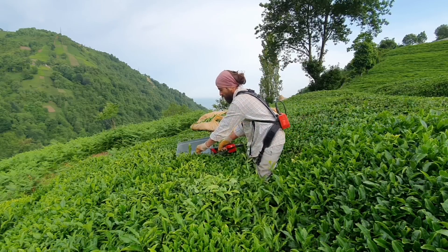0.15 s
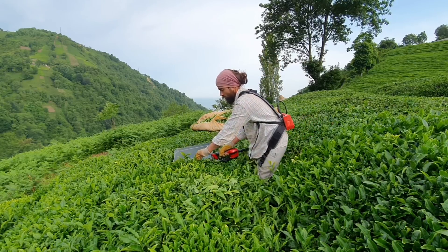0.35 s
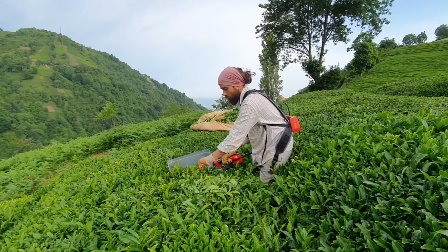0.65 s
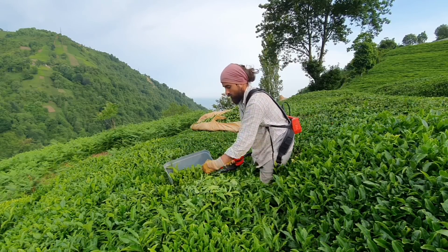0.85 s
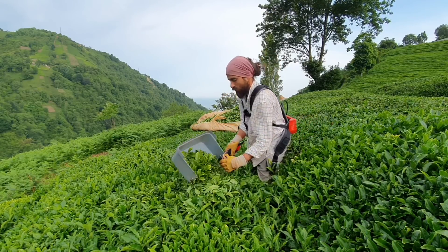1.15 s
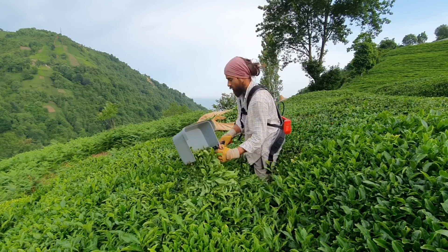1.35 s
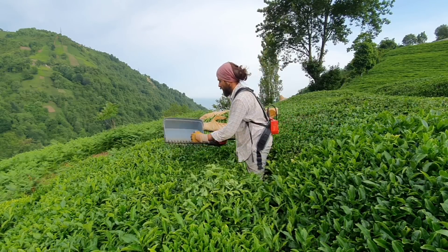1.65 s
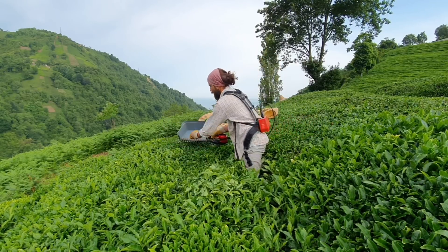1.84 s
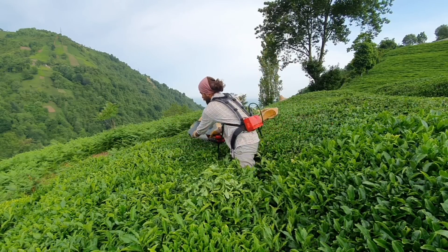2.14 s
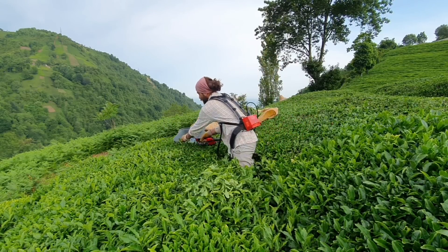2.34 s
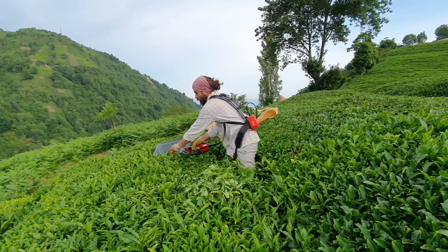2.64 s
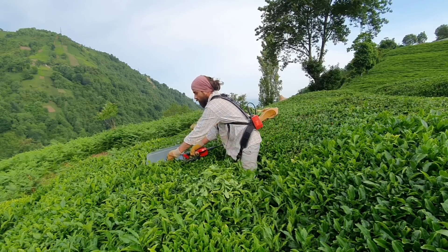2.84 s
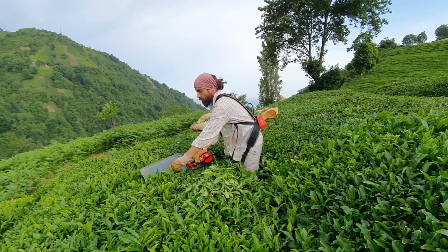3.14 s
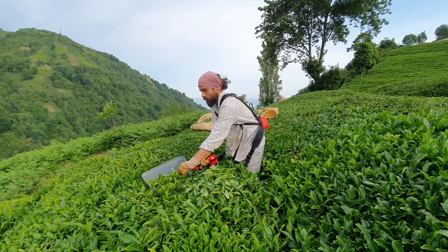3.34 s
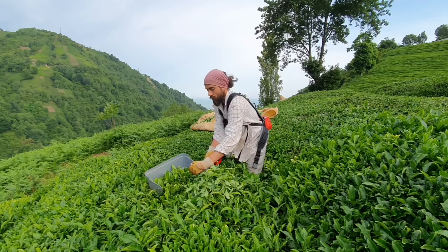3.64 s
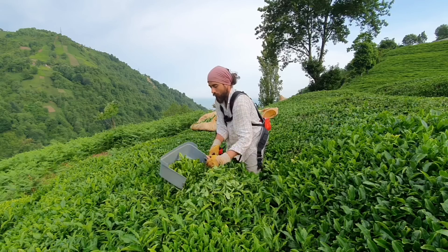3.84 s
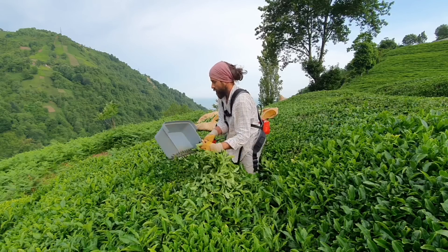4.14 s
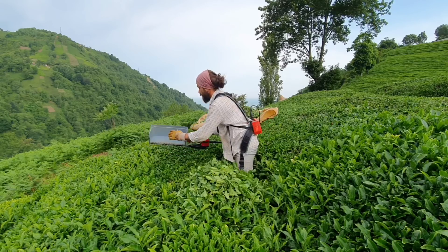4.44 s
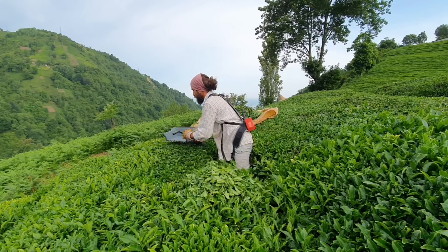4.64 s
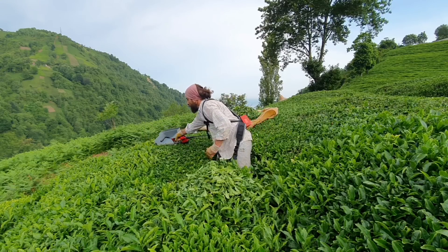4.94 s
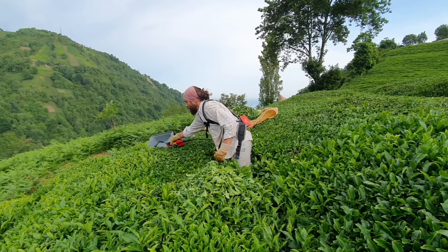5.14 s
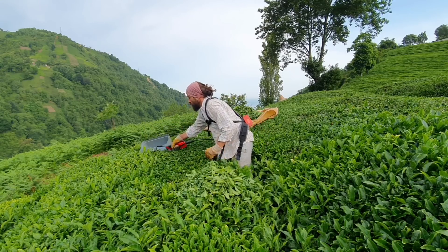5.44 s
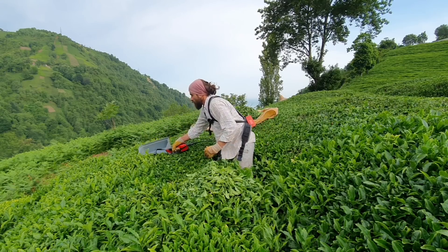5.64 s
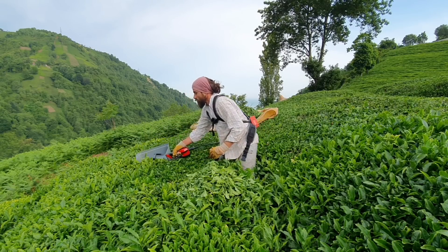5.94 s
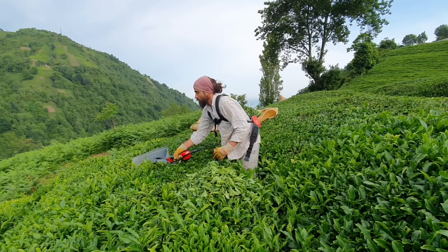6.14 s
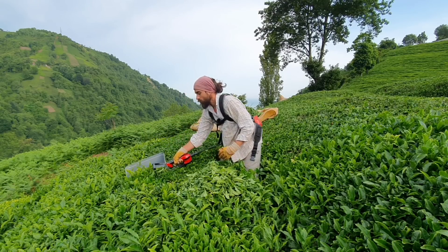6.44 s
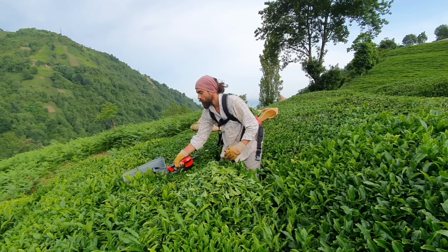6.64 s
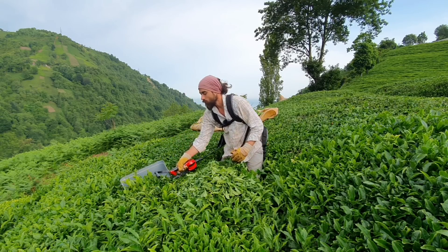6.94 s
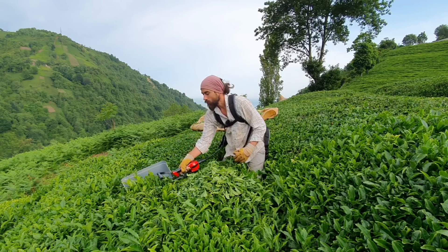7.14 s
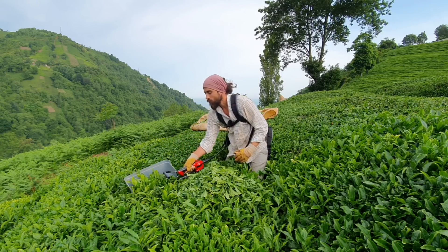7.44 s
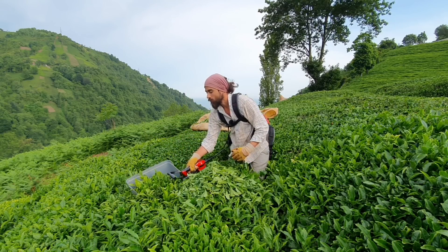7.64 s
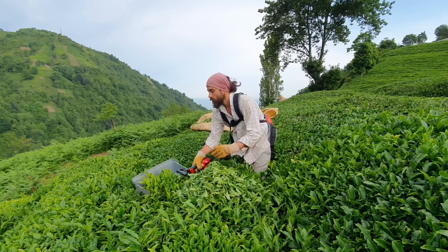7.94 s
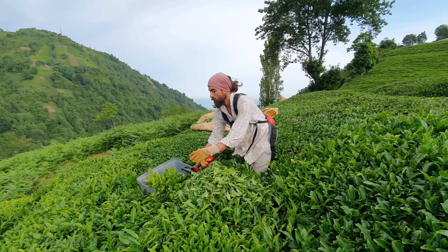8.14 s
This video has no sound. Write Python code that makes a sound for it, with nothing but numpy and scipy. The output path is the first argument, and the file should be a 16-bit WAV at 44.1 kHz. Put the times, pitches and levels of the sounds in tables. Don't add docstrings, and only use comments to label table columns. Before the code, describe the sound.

A battery-powered shear buzzes and clatters steadily through leafy bushes outdoors, its gear whine swelling while leaves snip and occasional woody stems crack.

```python
import sys
import numpy as np
from scipy import signal
from scipy.fft import rfft, irfft, next_fast_len
from scipy.io import wavfile
from scipy.ndimage import uniform_filter1d, map_coordinates

SR = 44100
rng = np.random.default_rng(int(sys.argv[2]) if len(sys.argv) > 2 else 0)


def volts_from_db(level):
    exponent = np.asarray(level, float) / 20
    return 10 ** exponent


def generate_wav(sig):
    pcm = np.round(np.clip(np.atleast_2d(sig).T, -1, 1) * 32767).astype(np.int16)
    wavfile.write(sys.argv[1], SR, pcm)


N = 365148

CRANK_HZ = 30.55
# (time [s], lateness [ms])
CRANK_LAG = [(0.0, 3.8), (1.0, 4.0), (1.2, 3.61), (1.6, 2.74), (1.8, 2.78), (2.0, 3.15), (2.6, 2.95),
             (3.1, 2.62), (3.8, 2.5), (4.4, 1.23), (4.8, 2.65), (5.25, 2.6), (5.6, 1.93), (6.0, 1.7),
             (6.4, 1.24), (7.3, 1.25), (7.8, 1.54), (8.28, 0.22)]

# (time [s], knock [dB], whine [dB], share of the open side facing the microphone [0-1])
BODY = [(0, -32.5, -23, 0.6), (.45, -35.5, -25, 0.26), (.65, -34.5, -38, 0.56), (1.08, -34, -29, 0.35),
        (1.18, -32, -20.5, 0.52), (1.4, -32, -20, 0.14), (1.65, -34.5, -20, 0.4), (1.87, -30.5, -22.5, 0.8),
        (2.1, -33.5, -27.5, 0.5), (2.9, -34, -23.5, 0.33), (3.5, -33, -33, 0.26), (4.05, -31.5, -28.5, 0.3),
        (4.22, -33, -21, 0), (4.45, -31, -22.5, 0.45), (4.6, -31.5, -29, 0.67), (4.85, -30, -27, 0.7),
        (5.15, -29, -20, 0.58), (5.28, -28, -25, 0.64), (5.55, -29.5, -25, 0.57), (5.82, -32, -31, 0.63),
        (6.5, -33, -31, 0.28), (7.25, -33, -29, 0.46), (8.28, -33, -32, 0.31)]
OPEN_SWAY, SHAKE_DB, WHINE_SHAKE_DB = .06, .5, 1
# (centre [Hz], width [Hz], level [dB])
HOUSING_MODES = [
    [(390, 32, 2), (577, 29, 3), (726, 180, -6.5), (896, 24, -6.5), (2020, 1130, -9.5)],
    [(390, 56, -8), (550, 21, -27), (686, 41, 2), (877, 38, 9.5), (1009, 47, -0.5), (1780, 750, 1)],
]
# (centre [Hz], width [Hz], level [dB])
THUD_MODES = [
    [(650, 370, 0)],
    [(810, 340, 0)],
]
# (centre [Hz], width [Hz], level [dB])
CASE_MODES = [
    [(1415, 210, 0)],
    [(1491, 110, 0)],
]
# (centre [Hz], width [Hz], level [dB])
TRAY_MODES = [(420, 45, -4), (568, 40, 0), (855, 55, 1)]
TRAY_DB = -9
# (time [s], rise [dB], width [s])
TRAY_LIFTS = [
    (1.68, 8, .3),
    (4.4, 7, .3),
]
# (place [fraction of a turn], level [dB])
FORWARD_STOPS = [
    (-.098, -10),
    (-.048, 0),
]
RETURN_PLACES = [
    .345,
    .397,
    .446,
]
# (time [s], first pin [dB], second pin [dB], stop [dB], lateness [turns])
RETURN_LEVELS = [(.5, -8, -5, -6, .002), (1.05, -9, -5, -6, 0), (1.25, -14, -4, -2.5, -.003),
                 (1.9, -14, -4, -2.5, -.003), (2.3, -5, -9, -8, 0), (2.9, -6, -9, -8, 0),
                 (3.4, -13, -6, -6, 0), (4.75, -13, -5, -4, 0), (4.95, -16, -9, -10, .006),
                 (5.55, -16, -9, -10, .006), (5.9, -14, -4, -6, .002), (6.6, -14, -4, -6, .002),
                 (7, -14, -11, -2.5, .004)]
# (time [s], level [dB])
KNOCK_ACCENTS = [(0.249, -7), (0.56, -10), (0.674, 3.4), (1.312, -3.2), (1.345, -8), (1.459, 2), (1.737, 3),
                 (1.934, -6), (2.048, -4), (2.081, -3.2), (2.13, -2.7), (2.474, -2), (2.507, -7),
                 (2.539, -3.2), (2.605, -1), (2.801, 1), (2.817, -5), (2.866, 2), (3.079, -3.3),
                 (3.095, -12), (3.423, -7), (3.537, 4), (3.75, 0), (3.946, -10), (4.06, 0), (4.289, -14),
                 (4.436, -12), (4.6, -3), (4.847, -1), (4.896, 1), (5.059, -2), (5.125, 8), (5.141, -2.8),
                 (5.19, 4), (5.419, 0.5), (5.484, 5), (5.517, 2), (6.057, 5), (6.089, -3), (6.302, 1),
                 (6.727, 2), (6.826, 0), (6.907, 0.5), (6.924, -6), (6.973, -10), (6.989, -8), (7.022, 5.0),
                 (7.104, 3.6), (7.12, -1), (7.137, 1), (7.153, -12), (7.251, -4.6), (7.579, -16),
                 (7.628, -2.7), (7.759, 5), (7.791, -14)]
# (time [s], level [dB])
CLACK_ACCENTS = [(0.069, -6), (0.101, 2), (0.265, -2.2), (0.413, -3), (0.445, 2), (0.478, -1), (0.609, 4.5),
                 (0.691, 0), (0.756, -1), (0.936, -4), (1.377, 1), (1.475, 0), (1.819, -3), (1.917, -4),
                 (1.967, -3), (1.999, -4), (2.539, 1), (2.556, -2.3), (2.605, -5), (2.637, -1.5),
                 (2.67, -1), (2.817, -2.1), (2.883, 1.5), (2.965, -2.6), (2.997, -2.2), (3.455, 1.5),
                 (3.554, 1), (3.684, -6), (3.75, 3.5), (3.766, -2), (3.93, -11), (4.126, -9), (4.224, 2.9),
                 (4.371, 1), (4.469, 1.5), (5.288, 2), (5.305, 1.9), (5.484, -3.1), (5.795, -1), (5.86, -3),
                 (6.237, 5), (6.629, 1), (6.695, 2.7), (6.809, -2), (6.858, -3.7), (6.989, 1.5),
                 (7.038, -4), (7.087, -6), (7.267, 2.5), (7.284, 0), (7.333, -1), (7.595, -1),
                 (7.611, -2.2), (7.644, -2.1), (7.791, 0), (8.069, 1.5)]
ACCENT_S = .011
# (time [s], after the forward stop [dB], close to the return
# stop [dB])
TAKE_UP = [(0, -21, -8.5), (1, -22, -10), (1.2, -8, -17), (1.9, -17, -21), (2.2, -20, -15), (3.9, -22, -12),
           (4.3, -21, -12), (4.8, -15, -10.5), (5.6, -22, -21), (6, -17, -15), (7, -14, -13),
           (8.28, -13.5, -15)]
TAKE_UP_HZ, TAKE_UP_WIDTH_HZ = 1433, 230

# (time [s], level [dB], ticks at the top end [dB], leaves between the teeth [dB],
# share of the far edge [0-1])
BLADES = [(0, -34.5, -22, -2, 0.25), (.5, -35, -28, -5, 0.28), (1.08, -36.5, -26, -13, 0.23),
          (1.2, -35.5, -12, -28, 0.65), (1.9, -35, -8, -28, 0.37), (2.3, -33, -10.5, -11, 0.37),
          (2.45, -34, -29, 2.5, 0.22), (2.9, -35.5, -34, 0.5, 0.23), (3.75, -36.5, -36.5, -14, 0.16),
          (4.1, -33.5, -12, -28, 0.25), (4.25, -34.5, -11, -21, 0.35), (4.72, -34.5, -6.5, -27, 0.8),
          (4.9, -38, -6, -16, 0.13), (5.45, -35, -14, -3, 0), (5.8, -36, -9.5, -4.5, 0.4),
          (6.7, -32, -11, -3.5, 0.62), (7.5, -34, -8.5, -8.5, 0.6), (8.28, -35.5, -7, -2, 0.48)]
# (centre [Hz], width [Hz], level [dB])
STEEL_MODES = [
    [(1987, 216, 1), (2466, 52, 6), (2840, 216, 2.5), (3400, 190, 8), (3983, 420, 8.5), (4093, 230, 9.5),
     (5000, 1180, -2.5), (6190, 530, 4), (6500, 680, 3), (7720, 1220, 2.5), (9520, 2850, -4)],
    [(1830, 150, 0), (3110, 170, -4), (3710, 290, 2.5), (4005, 590, 11.5), (4900, 680, 6), (5760, 410, 9.5),
     (6530, 280, 3), (7216, 225, 8.5), (8140, 1340, 2.5), (9500, 3700, -4)],
]
# (frequency [Hz], level [dB per Hz])
SLIDE_COLOUR = [(120, -20.5), (200, -11.5), (491, -1), (548, -4), (1200, -5), (1450, -10.5), (1610, -9.5),
                (2800, -5), (3820, -0.5), (9730, -39), (16000, -70)]
SLIDE_DB, SLIDE_YIELDS = -8, 0.21
SLAP_DB, SLAP_HZ, SLAP_WIDTH_HZ = -12, 2050, 900
# (time [s], loss [dB], width [s])
SNAGS = [
    (7.6, 1, 0.037),
]
# (time [s], loss [dB], width [s])
HIDDEN = [(4.95, 7, .2), (5.45, 3, .3), (2.6, 2, .8)]

# (time [s], peak [dB])
SNAPS = [(0.0992, -16), (0.4429, -21), (0.6559, -16), (1.1473, -14), (1.3753, -18), (3.7479, -20),
         (3.8127, -19), (3.9439, -20), (4.2213, -19), (4.7127, -20), (4.9097, -24), (6.0212, -21),
         (6.6428, -16), (6.6922, -18), (6.9052, -24), (6.9706, -23), (7.166, -19), (7.2654, -20),
         (7.2973, -24), (7.3467, -20), (7.5108, -21), (7.8047, -21), (7.887, -20), (8.2302, -21)]
SNAP_DB, SNAP_HZ, SNAP_WIDTH_HZ = -6, 4000, 5000

# (time [s], first cancelled frequency [Hz], strength [0-1])
BOUNCE = [(1.1, 1850, 0.8), (1.18, 2470, 0.8), (1.4, 2880, 0.94), (1.7, 2600, 0.62), (1.9, 2260, 0.77),
          (1.98, 2030, 0.9), (3.95, 1740, 0.5), (4.15, 2370, 1), (4.38, 2980, 0.96), (4.48, 2820, 1),
          (4.55, 2290, 0.6), (4.74, 2370, 0.55), (4.82, 3400, 1), (4.95, 4170, 0.98), (5.2, 4900, 0.54),
          (5.45, 4100, 0.74), (5.72, 3400, 1), (6.2, 2790, 0.96), (7.5, 2770, 0.97), (8.28, 2050, 0.8)]
# (time [s], span [s], centre [Hz],
# width [Hz], rise, or fall if negative [dB])
BAND_SWELLS = [(1.09, 0.21, 1780, 81, 8), (1.74, 0.33, 2140, 140, 5), (1.64, 0.17, 1800, 120, 4),
               (4.4, 0.081, 2110, 80, 9), (4.4, 0.11, 1700, 110, 9), (4.88, 0.065, 2000, 77, 18),
               (4.93, 0.092, 2380, 77, 12.5), (5.25, 0.22, 2440, 140, 1), (5.24, 0.54, 2040, 200, -8),
               (5.37, 0.38, 5200, 2100, -4), (8.06, 0.48, 3610, 690, 7.5), (4.3, 0.087, 3030, 290, 1),
               (1.4, 0.16, 1380, 50, 0.5), (8, 0.23, 1410, 44, 8), (4.72, .1, 3600, 1000, 3),
               (7.87, 0.43, 520, 110, -4), (7.5, 0.96, 880, 110, 3), (1.71, 0.14, 892, 43, 13),
               (1.7, 0.21, 503, 51, 8.5), (0.77, 0.51, 3000, 120, 1), (0.98, 0.36, 3900, 230, 2),
               (3, 0.31, 2700, 120, 0), (3.1, 0.38, 3770, 150, -9), (2.04, .08, 2200, 220, 6.5),
               (1.58, 0.14, 660, 36, -3), (4.5, 0.35, 500, 50, 3), (4.45, .2, 750, 46, 2),
               (4.67, 0.24, 370, 60, -5), (5.18, 0.3, 3550, 400, -4), (5.15, .2, 2900, 180, 0),
               (4.4, .15, 13400, 2500, 6), (4.2, 0.092, 13000, 2500, 2), (5.65, 0.18, 7700, 1600, 5.5),
               (6.66, 0.74, 790, 59, -3), (6.6, 0.22, 980, 51, 6), (6.6, .3, 2200, 300, -3.5),
               (5.1, 0.26, 750, 41, 2), (1.18, 0.054, 2100, 60, 5), (1.4, .12, 2160, 110, 2),
               (8.2, .15, 400, 100, 4)]
SINK_DB_PER_S = 1.3

# (time [s], length [s])
FLICKER = [(1.26, .1), (1.45, .15), (1.75, .08), (2.03, .08), (2.31, .26), (2.7, .035), (2.84, .03),
           (3.08, .03), (3.14, .11), (4.02, .02), (4.17, .03), (4.68, .06), (4.81, .04), (5.14, .025),
           (6.19, .06), (6.35, .03), (6.72, .03), (6.885, .13), (7.04, .135), (7.49, .06), (7.57, .145),
           (7.78, .065), (7.91, .265)]
FLECKS = [.165, 1.26, 1.41, 2.34, 3.095, 3.17, 3.22, 3.92, 3.97, 4.023, 4.116, 4.66, 4.725, 4.77, 5.17,
          6.14, 6.885, 6.955, 7.274, 7.46, 7.6, 7.635, 7.785, 7.88, 7.97, 8.063, 8.2]
FLECK_S, FLECK_HZ, TOP_HZ = .012, 4800, 11700

# (multiple of the crank rate, level [dB])
HUM_ORDERS = [(3, -92), (4, -79), (5, -76), (6, -62.5), (8, -61.5), (18, -60.5)]
HUM_DB, HUM_SWAY_DB = -3, 1
# (time [s], rise [dB], width [s])
LEANS = [(.5, 11.5, 0.25), (1.65, 10.5, 0.3), (2.62, 13, 0.24), (2.93, 10, .06), (3.4, 7.5, 0.35),
         (4.5, 6.5, 0.36), (5.5, 3, 0.84), (6.5, 9.5, 0.91)]
# (time [s], level [dB], width [s])
UPPER_HUM_GROWS = [(7.2, 1.5, 1.7), (1.3, -10, .5), (0.52, -13, 0.43), (4.7, -8, 0.3), (2.66, -15, .15)]
THUMP_HIDES_S, THUMP_LOSS_DB = 4.55, 10
# (frequency [Hz], level [dB per Hz])
WIND_COLOUR = [(15, -45), (30, -32), (45, -20), (70, -10.5), (110, -5.5), (170, -0.5), (260, -4),
               (340, 0.5), (450, -6), (700, -120)]
WIND_DB, WIND_SAG_DB_PER_S, WIND_SWAY_DB = -63.5, 1.3, 2
# (time [s], rise [dB], width [s])
GUSTS = [(.6, 0, 0.29), (1.1, 6.5, 0.071), (2.9, 1, 0.44), (5.4, 4, 0.22), (7.68, 10, 0.074)]


def housing(turns):
    knock_db, _, side = curves(BODY)
    knock_db = knock_db + SHAKE_DB * wobble(7)
    side = side + OPEN_SWAY * wobble(4.03)

    def dull_twice(modes):
        return lambda hz: (ringing(modes)(hz) / (1 + 1j * hz / 950 - (hz / 950) ** 2)) ** 2

    def without_bass(modes):
        return lambda hz: ringing(modes)(hz) / (1 + (330 / (hz + 1)) ** 4)

    stops = reversals(turns)
    tray = unit(filtered(stops, lambda hz: sum(ringing([mode])(hz) ** 2 for mode in TRAY_MODES)))
    thud = faces(stops, THUD_MODES, side, dull_twice) + volts_from_db(TRAY_DB + bumps(TRAY_LIFTS)) * tray
    knocks = blows(turns, [(-.1, 0), (.365, 0)], jitter_ms=.25, scatter_db=1.2)
    rattle = bursts(knocks, rise_ms=.7, fall_ms=3) + volts_from_db(-2.5) * rng.standard_normal(N)
    loose = faces(rattle, HOUSING_MODES, side, without_bass)
    body = unit(unit(thud) + volts_from_db(-5.5) * unit(loose))
    return volts_from_db(knock_db) * (volts_from_db(accents(KNOCK_ACCENTS)) * body + take_up(turns))


def reversals(turns):
    *levels_db, late = curves(RETURN_LEVELS)
    train = blows(turns, FORWARD_STOPS, jitter_ms=.05, scatter_db=.6)
    for place, db in zip(RETURN_PLACES, levels_db):
        train = train + volts_from_db(db) * blows(turns - late, [(place, 0)], jitter_ms=.06, scatter_db=.6)
    return train


def take_up(turns):
    forward_db, return_db = curves(TAKE_UP)

    def ring_after(place):
        hit = unit(blows(turns, [(place, 0)], jitter_ms=.2, scatter_db=2))
        return unit(filtered(hit, lambda hz: ringing([(TAKE_UP_HZ, TAKE_UP_WIDTH_HZ, 0)])(hz) ** 2))

    return volts_from_db(forward_db) * ring_after(.045) + volts_from_db(return_db) * ring_after(.435)


def blades(turns):
    level_db, tick_db, leaves_db, edge = curves(BLADES)
    level_db = level_db - bumps(SNAGS) + accents(CLACK_ACCENTS)
    slide_db = SLIDE_DB - SLIDE_YIELDS * tick_db

    clacks = blows(turns, [(-.08, 0), (.405, -1.8)], jitter_ms=.3, scatter_db=.9)
    clack = bursts(clacks, rise_ms=.1, fall_ms=3.8)
    slap_places = [(-.07, 0), (-.035, -3), (.425, -.7), (.46, -4)]
    slap = unit(blows(turns, slap_places, jitter_ms=.2, scatter_db=1.5))
    forth = blows(turns, [(-.082, 0)], jitter_ms=.4, scatter_db=1.5)
    back = volts_from_db(-bumps(HIDDEN)) * blows(turns, [(.4, -3)], jitter_ms=.5, scatter_db=2)
    tick = bursts(forth + back, rise_ms=.5, fall_ms=5)
    snips = blows(turns, [(.2, 0), (.69, -.8)], jitter_ms=.5, scatter_db=2.2)
    snip = bursts(snips, rise_ms=.5, fall_ms=2)
    speed = 1 - 0.44 * np.cos(4 * np.pi * (turns + 0.23)) ** 4
    roughness = volts_from_db(2.57 * wobble(400) + 0.069 * wobble(25))
    grit = volts_from_db(slide_db) * unit(speed * rng.standard_normal(N) * roughness)

    struck = clack + volts_from_db(-14) * slap + volts_from_db(3) * grit + volts_from_db(leaves_db - 12) * snip
    steel = faces(struck, STEEL_MODES, edge, ringing)
    leaves = unit(filtered(grit, colour(SLIDE_COLOUR)))
    crisp = snip + volts_from_db(-40) * unit(grit)
    crisp = unit(filtered(crisp, lambda hz: ringing([(7400, 5500, 0)])(hz) ** 2))
    hiss = tick + volts_from_db(-4) * grit
    top = unit(filtered(hiss, lambda hz: ringing([(10000, 5500, 0)])(hz) ** 2))
    heel = unit(filtered(slap, lambda hz: ringing([(SLAP_HZ, SLAP_WIDTH_HZ, 0)])(hz) ** 2))
    cutting = steel + volts_from_db(SLAP_DB) * heel + volts_from_db(-2.5) * leaves
    cutting = cutting + volts_from_db(leaves_db - 8) * crisp + volts_from_db(tick_db) * top
    return volts_from_db(level_db - 1.5) * cutting


def gears(turns):
    _, whine_db, side = curves(BODY)
    whine_db = whine_db + WHINE_SHAKE_DB * wobble(4.24)
    stroke = 4 * np.pi * turns
    mesh = 2 * np.pi * 47 * turns
    mesh = mesh + 0.8 * np.sin(stroke - 4.1) + 0.75 * wobble(40) + 1.2 * wobble(5.2)
    load = 1 + .7 * np.cos(stroke - 2.1) - .2 * np.sin(stroke / 2)
    tone = np.sin(mesh) * volts_from_db(0.68 * wobble(50))
    tone = tone + volts_from_db(-6) * np.sin(2 * mesh) * volts_from_db(1.4 * wobble(59))

    def ringing_twice(modes):
        return lambda hz: ringing(modes)(hz) ** 2

    case = load * faces(rng.standard_normal(N), CASE_MODES, 2 * side - .2, ringing_twice)
    return volts_from_db(whine_db - 21) * unit(unit(load * tone) + volts_from_db(-5) * unit(case))


def stems():
    s, db = np.transpose(SNAPS)
    train = np.bincount((s * SR).astype(int), volts_from_db(db + SNAP_DB), N)
    t = np.arange(400) / SR
    crack = signal.fftconvolve(train, np.exp(-t / .0012))[:N] * rng.standard_normal(N)
    return filtered(crack, lambda hz: ringing([(SNAP_HZ, SNAP_WIDTH_HZ, 0)])(hz) ** 2)


def bush_tops(x):
    hz, t, z = signal.stft(x, SR, nperseg=512)
    hz = hz[:, None]
    s, hollow_hz, strength = np.transpose(BOUNCE)
    ratio = hz / np.interp(t, s, hollow_hz)
    copy = np.clip(np.interp(t, s, strength) + 0.02, 0, 1) * np.exp(-(ratio / 1.09) ** 4 - 2j * np.pi * ratio)
    field = uniform_filter1d(rng.standard_normal(z.shape), size=4, axis=0)
    field = uniform_filter1d(field, size=30, axis=1)
    glint_db = 1.33 * unit(field) * np.clip(hz / 3000, 0, 1)
    for at, span, centre_hz, width_hz, db in BAND_SWELLS:
        glint_db = glint_db + db * np.exp(-((t - at) / span) ** 2 - ((hz - centre_hz) / width_hz) ** 2)
    sink_db = SINK_DB_PER_S * t * (hz / 16000) ** 2
    return signal.istft(z * (1 - copy) * volts_from_db(glint_db - sink_db), SR, nperseg=512)[1][:N]


def flicker(mid):
    hz, t, z = signal.stft(mid, SR, nperseg=512)

    def during(spans):
        return np.any([(t > s - .006) & (t < s + length + .006) for s, length in spans], axis=0)

    top = np.outer(hz > TOP_HZ, during(FLICKER))
    below = np.outer((hz > FLECK_HZ) & (hz < TOP_HZ), during([(s, FLECK_S) for s in FLECKS]))
    scrambled = z * np.exp(2j * np.pi * rng.random(z.shape))
    return signal.istft(scrambled * (top | below), SR, nperseg=512)[1][:N]


def hum(turns):
    t = np.arange(N) / SR
    hum_db = HUM_DB + bumps(LEANS) + HUM_SWAY_DB * wobble(3.1)
    orders = np.zeros(N)
    for k, db in HUM_ORDERS:
        order_db = db + .8 * wobble(3) + (k == 8) * bumps(UPPER_HUM_GROWS)
        orders += volts_from_db(order_db) * np.sin(2 * np.pi * k * turns)
    wind_db = WIND_DB - WIND_SAG_DB_PER_S * t + bumps(GUSTS) + WIND_SWAY_DB * wobble(3.7)
    wind = unit(filtered(rng.standard_normal(N) * volts_from_db(.9 * wobble(8)), colour(WIND_COLOUR)))
    thump = volts_from_db(-2 - THUMP_LOSS_DB * (t > THUMP_HIDES_S)) * np.sin(4 * np.pi * turns)
    return volts_from_db(hum_db) * orders + volts_from_db(wind_db) * (volts_from_db(10.5) * wind + thump)


def blows(turns, places, jitter_ms, scatter_db):
    whole = np.arange(300)
    train = np.zeros(N)
    for place, db in places:
        chance = rng.standard_normal((len(whole), 2))
        at = np.interp(whole + place, turns, np.arange(N), right=2 * N)
        at = at + jitter_ms * SR / 1000 * chance[:, 0]
        inside = (at > 0) & (at < N - 1)
        train += np.bincount(at[inside].astype(int), volts_from_db(db + scatter_db * chance[inside, 1]), N)
    return train


def bursts(train, rise_ms, fall_ms):
    t_ms = np.arange(1500) / SR * 1000
    shape = np.exp(-t_ms / fall_ms) * (1 - np.exp(-t_ms / rise_ms))
    return unit(np.abs(signal.fftconvolve(train, shape)[:N]) * rng.standard_normal(N))


def faces(x, pair, share, shape):
    angle = np.clip(share, 0, 1) * np.pi / 2
    first, second = (unit(filtered(x, shape(modes))) for modes in pair)
    return np.cos(angle) * first + np.sin(angle) * second


def ringing(modes):
    def response(f):
        total = 0
        for k, (c, w, db) in enumerate(modes):
            total = total + (-1) ** k * volts_from_db(db) * 1j * f * w / (c * c - f * f + 1j * f * w)
        return total
    return response


def colour(points):
    f, db = np.transpose(points)
    return lambda hz: volts_from_db(np.interp(np.log(hz + 1), np.log(f + 1), db))


def filtered(x, response):
    m = next_fast_len(N + 8192)
    return irfft(rfft(x, m) * response(np.fft.rfftfreq(m, 1 / SR)), m)[..., :N]


def accents(rows):
    s, db = np.transpose(rows)
    marks = np.bincount((s * SR).astype(int), db, N)
    return signal.fftconvolve(marks, signal.windows.tukey(int(ACCENT_S * SR), .5), mode="same")


def bumps(rows):
    return sum(height * np.exp(-((np.arange(N) / SR - s) / width) ** 2) for s, height, width in rows)


def curves(rows):
    s, *cols = np.transpose(rows)
    return [np.interp(np.arange(N) / SR, s, c) for c in cols]


def wobble(rate):
    return map_coordinates(rng.standard_normal(int(N * rate / SR) + 4), [np.arange(N) * rate / SR])


def unit(x):
    return x / np.sqrt(np.mean(x ** 2) + 1e-20)


def scene():
    lag_ms = curves(CRANK_LAG)[0]
    turns = CRANK_HZ * (np.arange(N) / SR - lag_ms / 1000)
    tool = bush_tops(volts_from_db(-6) * housing(turns) + gears(turns) + blades(turns))
    mid = tool + hum(turns) + stems()
    side = volts_from_db(-6.5) * flicker(mid)
    return np.array([mid + side, mid - side])


def band_limit(x):
    return signal.sosfilt(signal.butter(12, 16100, fs=SR, output="sos"), x)


def record(dry):
    soft = dry / (1 + np.abs(dry / .145) ** 4) ** (1 / 4)
    mix = filtered(soft, lambda hz: hz < 15780)
    return band_limit(mix)


dry = scene()
out = record(dry)
generate_wav(out)
```